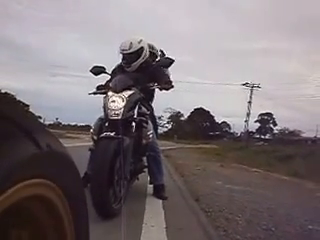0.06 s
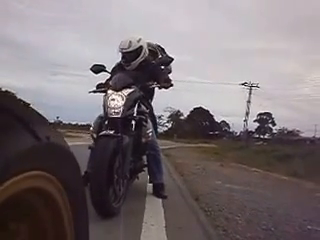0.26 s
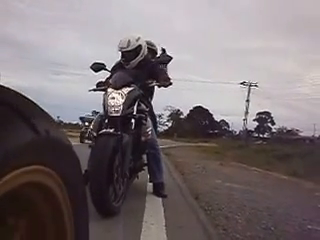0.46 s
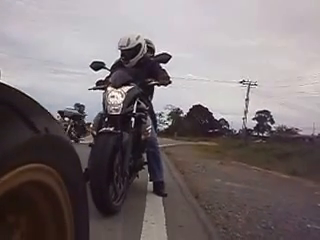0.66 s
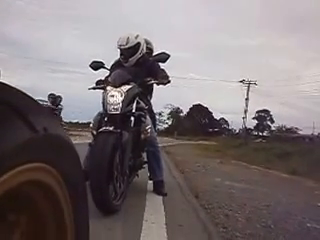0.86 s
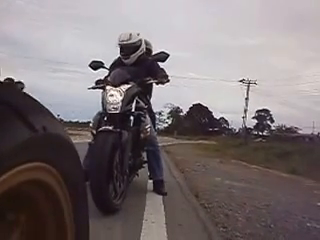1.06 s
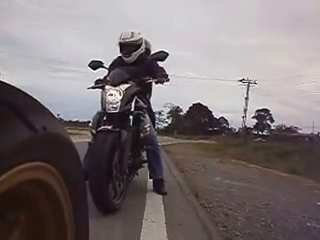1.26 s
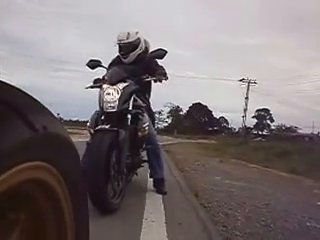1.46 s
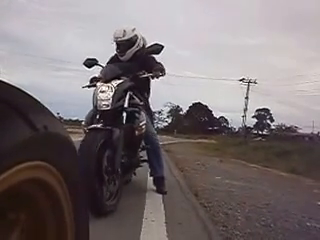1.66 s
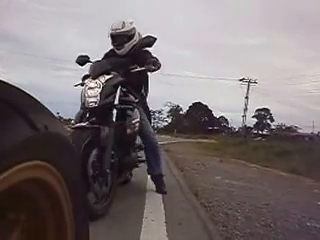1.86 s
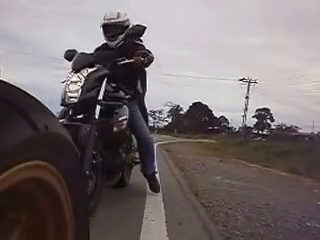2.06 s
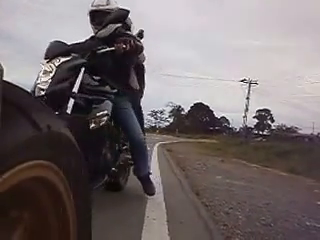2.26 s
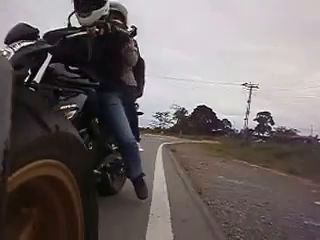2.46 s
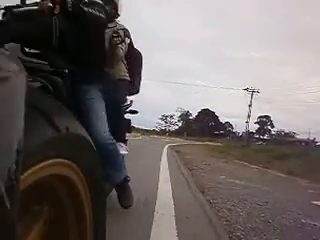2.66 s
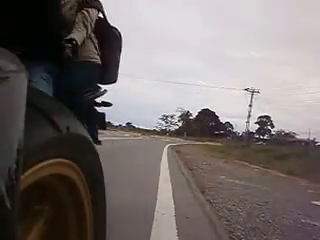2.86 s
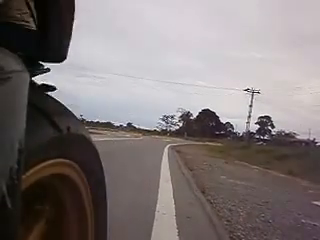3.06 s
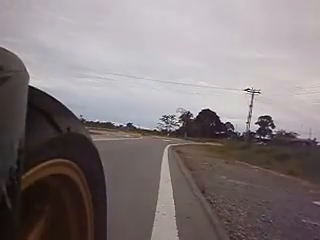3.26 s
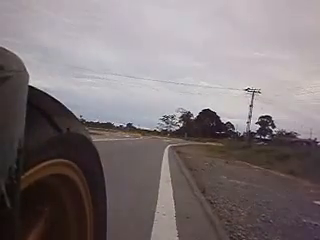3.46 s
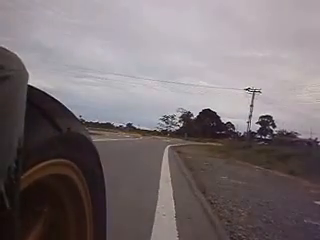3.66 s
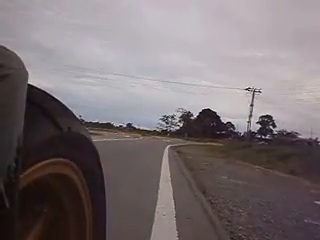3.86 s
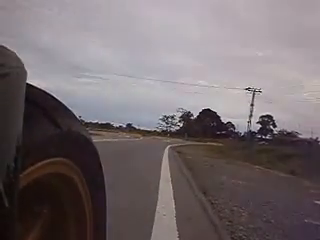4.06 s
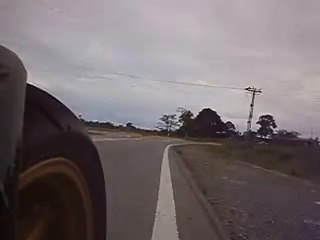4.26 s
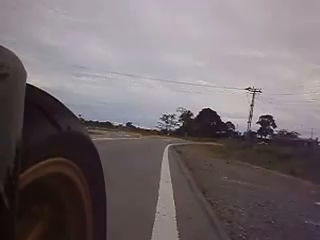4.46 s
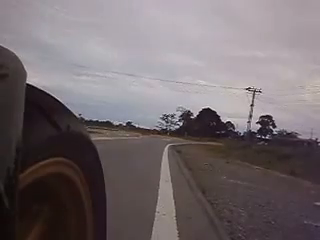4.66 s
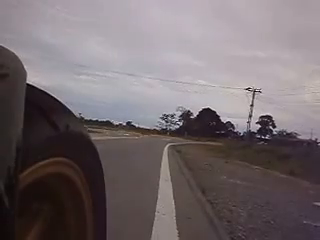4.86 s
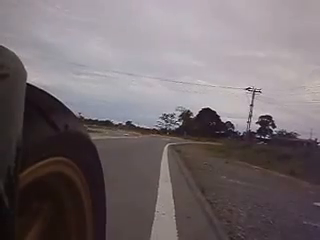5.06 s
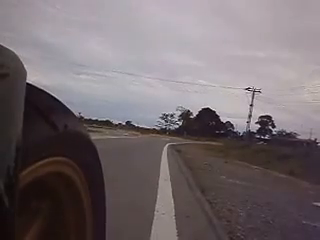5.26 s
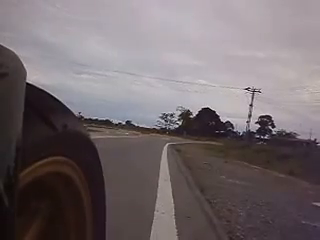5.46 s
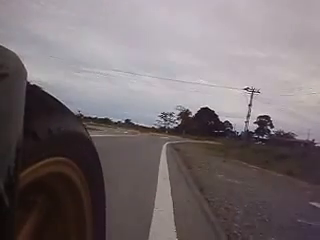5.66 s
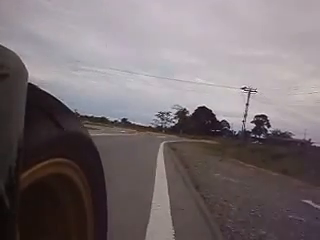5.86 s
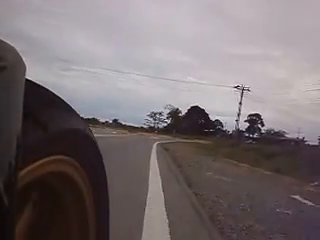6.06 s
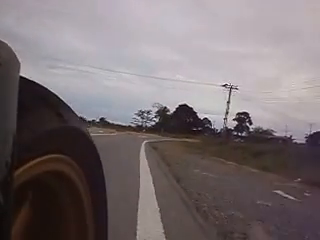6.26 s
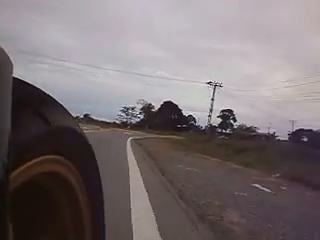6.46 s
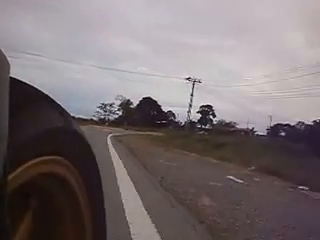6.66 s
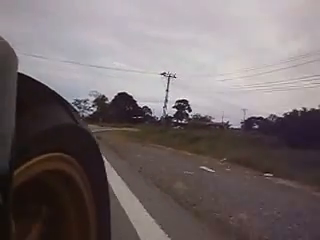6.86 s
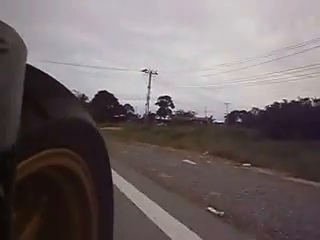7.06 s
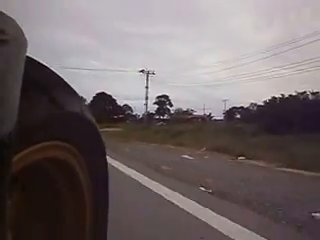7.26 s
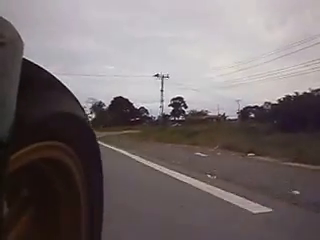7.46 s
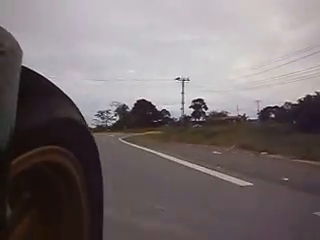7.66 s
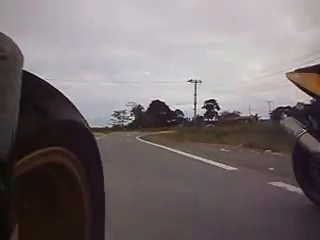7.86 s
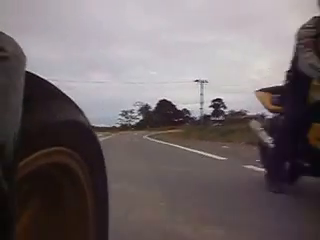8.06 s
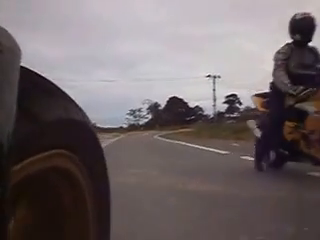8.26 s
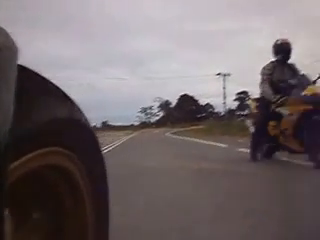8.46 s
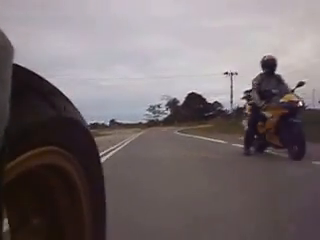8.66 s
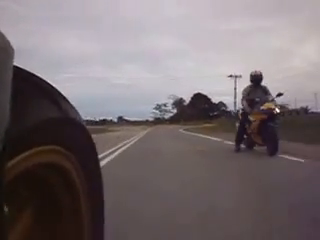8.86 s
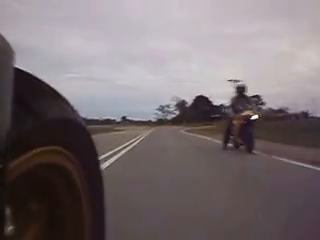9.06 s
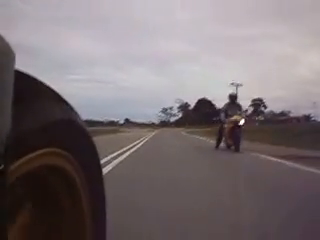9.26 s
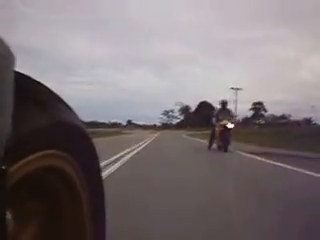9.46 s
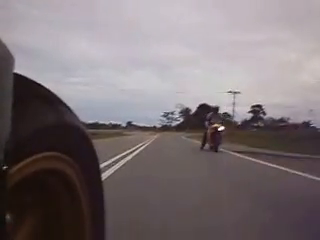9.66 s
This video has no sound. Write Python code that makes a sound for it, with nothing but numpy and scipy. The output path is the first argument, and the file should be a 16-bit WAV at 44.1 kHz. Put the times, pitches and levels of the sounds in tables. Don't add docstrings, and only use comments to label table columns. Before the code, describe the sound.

Close low-mounted microphone by a motorcycle: cranking starter, lumpy twin idle, four throttle blips, gear clunk, then a rising, rasping, overloaded pull-away.

```python
import sys
import numpy as np
from scipy import signal
from scipy.fft import rfft, irfft, next_fast_len
from scipy.io import wavfile
from scipy.ndimage import uniform_filter1d, map_coordinates

SR = 44100
rng = np.random.default_rng(int(sys.argv[2]) if len(sys.argv) > 2 else 0)


def boost_factor(decibels):
    exponent = np.asarray(decibels, float) / 20
    return 10 ** exponent


def wrap_up_sound(samples):
    columns = np.atleast_2d(samples).T
    tamed = np.clip(columns, -1, 1)
    steps = np.round(tamed * 32767).astype(np.int16)
    wavfile.write(sys.argv[1], SR, steps)


N = 428211


def unit(x):
    return x / np.sqrt(np.mean(x ** 2) + 1e-20)


def clock():
    return np.arange(N) / SR


def curves(rows):
    s, *cols = np.transpose(rows)
    return [np.interp(clock(), s, c) for c in cols]


def wobble(rate):
    return map_coordinates(rng.standard_normal(int(N * rate / SR) + 4), [np.arange(N) * rate / SR])


def bump(t, centre, half):
    return np.exp(-((t - centre) / half) ** 2)


def filtered(x, response):
    m = next_fast_len(len(x) + SR // 2)
    return irfft(rfft(x, m) * response(np.fft.rfftfreq(m, 1 / SR)), m)[:len(x)]


def colour(points):
    f, db = np.transpose(points)
    return lambda hz: boost_factor(np.interp(np.log(hz + 1), np.log(f), db))


def noise(points):
    return unit(filtered(rng.standard_normal(N), colour(points)))


def pipes(modes):
    def mode(f, centre, width, db):
        return boost_factor(db) * SR / np.pi * 1j * f / 2 / (centre * centre - f * f + 1j * f * width)
    return lambda f: sum(mode(f, *row) for row in modes)


def spikes(times, sizes):
    at = np.clip(times * SR, 0, N - 2)
    i = at.astype(int)
    return np.bincount(i, sizes * (1 - at + i), N) + np.bincount(i + 1, sizes * (at - i), N)


# t/s, speed [four-stroke cycles/s]
PULL_AWAY = [(5.442, 19.33), (5.591, 24.98), (5.889, 21.5), (6.086, 20.72), (6.67, 22.35), (6.93, 23.88),
             (7.203, 26.03), (7.512, 31.02), (7.804, 30.45), (8.311, 38.96), (8.719, 46.48), (9.582, 63.88),
             (9.71, 57.95)]
# t/s of first hard bang, held open [s], spin-up [s], peak speed [cycles/s]
THROTTLE_BLIPS = [
    (3.08, .13, .103, 21.07),
    (3.732, .078, .035, 21.46),
    (4.401, .129, .088, 22.84),
    (5.134, .076, .065, 21.63),
]
FIRST_PUFF_S = 1.963


def crank():
    settle_s, first_rate, idle_rate = .813, 7.79, 12.42
    free_rate, sag_per_s = 13.81, 16.12
    t = clock()
    rate = np.interp(t, [FIRST_PUFF_S, FIRST_PUFF_S + settle_s], [first_rate, idle_rate]) * (t >= FIRST_PUFF_S)
    for s, _, spin, peak in THROTTLE_BLIPS:
        blip = np.interp(t, [s, s + spin, s + spin + 1], [free_rate, peak, peak - sag_per_s])
        rate = np.where(t >= s, blip, rate)
    rate = np.where(t >= PULL_AWAY[0][0], curves(PULL_AWAY)[0], rate)
    return np.cumsum(rate) / SR, rate


def wind():
    buffet = noise([(12, -35.5), (30, -3.5), (60, 10), (150, -17), (600, -50.5)])
    return boost_factor(-46.5 + 1.9 * wobble(3.9)) * buffet


def idler(rate, pattern_db, scatter_db, jitter):
    cycle = np.cumsum(rate * (1 + .02 * wobble(1.3))) / SR
    beats = np.arange(1, int(cycle[-1]))
    chance = rng.standard_normal((int(N / SR * 70), 2))[:len(beats)]
    times = np.interp(beats + jitter * chance[:, 0], cycle, clock())
    return spikes(times, boost_factor(np.resize(pattern_db, len(beats)) + scatter_db * chance[:, 1]))


# f/Hz, level/dB
PASSER_RASP = [(400, -42), (800, -6.5), (1050, 0.5), (1600, -4), (2000, -12.5), (4000, -23.5), (5500, -75)]


def passer():
    pass_s, pass_half_s, pass_db = 1.315, 0.39, -33
    rasp = boost_factor(2.7 * wobble(40)) * noise(PASSER_RASP)
    return boost_factor(pass_db) * bump(clock(), pass_s, pass_half_s) * rasp


# t/s, thump level/dB
IDLERS_LEVEL = [
    (0, -21.5),
    (1.0, -19),
    (1.6, -16.5),
    (2.06, -23.5),
    (2.74, -23.5),
    (3.4, -33),
    (4.2, -29.5),
    (4.6, -26),
    (5.7, -33),
    (7.6, -19),
]
# f/Hz, level/dB
IDLERS_THUMP = [(18, -40.5), (30, -6.5), (119, 1), (214, -5), (237, -9.5), (300, -6.5), (380, -12),
                (524, -20), (581, -64), (1000, -28.5), (1300, -71.5), (2200, -120)]
# f/Hz, level/dB
VALVE_HISS = [(290, -8), (500, -4.5), (708, -7), (1070, -15), (1560, -15.5), (2210, -20.5), (2530, -24.5),
              (3740, -23), (4200, -30), (5460, -70.5), (9240, -120)]


def nearby():
    gear_db = -20
    valve_db, valve_power, valve_top = -22.5, 1.15, 90.4
    thump_db = curves(IDLERS_LEVEL)[0]
    valves = boost_factor(valve_db) * np.minimum(crank()[1] / valve_top, 1) ** valve_power
    gear = boost_factor(thump_db + gear_db) + valves
    beats = idler(53, [0, -3, -2], 1.8, .04) + .7 * idler(40.5, [0, -2.5], 1.8, .06)
    thump = 0.6 * unit(filtered(beats, colour(IDLERS_THUMP))) + 0.44 * noise(IDLERS_THUMP)
    hiss = boost_factor(1.2 * wobble(25) + 0.75 * wobble(4.8)) * noise(VALVE_HISS)
    swell_db = 1.1 * wobble(4)
    return boost_factor(thump_db + 4.5 + swell_db) * thump + boost_factor(4.37) * gear * hiss


# t/s, level/dB, rise [ms], centre f/Hz, bandwidth f/Hz
METAL_CONTACTS = [
    (0.704, -32, 0.97, 2020, 1540),
    (1.309, -22.5, 2.3, 2720, 3000),
    (1.568, -16, 15, 2030, 600),
    (1.579, -10, 2.7, 1680, 404),
    (1.582, -18, 4.9, 3220, 476),
    (4.969, -7.5, 9, 3460, 1360),
    (4.974, -11, 3.5, 990, 1160),
    (4.999, -17.5, 6.1, 2760, 2660),
    (5.033, -16.5, 5.8, 2160, 2460),
]


def clacks():
    t60_s = 0.068
    out, t = np.zeros(N + SR), np.arange(SR // 5) / SR
    for s, db, rise_ms, hz, width in METAL_CONTACTS:
        rattle = unit(filtered(rng.standard_normal(len(t)), pipes([(hz, width, 0)])))
        envelope = boost_factor(db - 60 * t / t60_s) * (1 - np.exp(-1000 * t / rise_ms))
        out[round(s * SR):][:len(t)] += envelope * rattle
    return out[:N]


# t/s, shaft f/Hz, whine level/dB
STARTER_SHAFT = [
    (1.31, 154.7, -26),
    (1.4, 163.6, -27),
    (1.43, 130, -41),
    (1.48, 142, -23.5),
    (1.54, 138.4, -32),
    (1.62, 164.3, -37),
    (1.76, 214.2, -32.5),
    (2.65, 215.7, -34.5),
    (2.95, 183.7, -50),
]
# shaft order, level/dB
TOOTH_ORDERS = [(7.4, -19.5), (9, -8), (10, -3), (11, -14), (14, -14), (20, -19.5)]
# f/Hz, level/dB
BRUSH_NOISE = [(350, -32), (600, -20.5), (683, -14.5), (1770, -12.5), (2190, -8.5), (2540, -18.5),
               (3870, -18), (4200, -16.5), (5460, -88.5), (9240, -120)]


def starter():
    brush_running_db, surge_db, surge_s = -31, 7.5, 0.3
    slip_s, slip_half_s, slip_db = 1.548, .022, -18
    drop_out_s, run_down_db_per_s = 3.12, 204
    (shaft_hz, whine_db), t = curves(STARTER_SHAFT), clock()
    on, off = STARTER_SHAFT[0][0], STARTER_SHAFT[-1][0]
    whine_db = whine_db - run_down_db_per_s * np.maximum(t - off, 0)
    brush_db = brush_running_db + surge_db * bump(t, on, surge_s) + slip_db * bump(t, slip_s, slip_half_s)
    brush_db = brush_db - run_down_db_per_s * np.maximum(t - drop_out_s, 0)
    switch = np.clip((t - on) / .005 + 1, 0, 1)
    turn = 2 * np.pi * np.cumsum(shaft_hz * (1 + 0.0055 * wobble(20) + 0.0028 * wobble(90))) / SR
    whine = sum(boost_factor(db + 1.5 * wobble(25)) * np.sin(k * turn) for k, db in TOOTH_ORDERS)
    brush = (1 + 0.15 * np.cos(turn)) * noise(BRUSH_NOISE)
    spark_db = 1.4 * wobble(60)
    return switch * (boost_factor(whine_db + 3.0) * whine + boost_factor(brush_db + spark_db) * brush)


LIFT_S = 9.62
# cycle order, level/dB
SHAKE_ORDERS = [(1, 8), (2, -5.5), (6, 0.5)]


def frame():
    shake_db, power, top_rate, lift_db = -11, 4.5, 54.5, -14.5
    cycle, rate = crank()
    lifted = np.clip((clock() - LIFT_S) / .03, 0, 1)
    shake = np.minimum(rate / top_rate, 1) ** power * boost_factor(shake_db + lift_db * lifted)
    orders = sum(boost_factor(db + 0.65 * wobble(2.7)) * np.sin(2 * np.pi * k * cycle) for k, db in SHAKE_ORDERS)
    return shake * orders


# t/s, level/dB, second cylinder relative level/dB
LOADED_BANGS = [
    (5.44, 1, -5),
    (6.0, -2, -4),
    (6.6, 0, -7),
    (7.049, -2, 3.5),
    (7.5, 4, 4.5),
    (7.998, 1, 6.5),
    (8.551, 10.5, -6),
    (9.55, 3.5, 0),
    (9.71, 2, 7),
]
# t/s, half length [s], level/dB
STUMBLES = [
    (2.26, 0.17, -16),
    (4.847, .05, -10.5),
]
# speed [cycles/s], lag [share of a cycle], level/dB
AFTER_PUFF = [(21, .43, -15), (33, .44, -8.5), (52, .464, -2)]


def firings():
    second_lag = .237
    misfire_rate, misfire_db = 16, -15
    idle_db, blip_level_db, overrun_db = -5.5, 0, -8
    idle_lean_db, blip_lean_db = 0.5, -2.5
    shut_scatter_db, open_scatter_db = 1.4, .6
    (cycle, rate), t = crank(), clock()
    away_s, blip_starts = PULL_AWAY[0][0], [b[0] for b in THROTTLE_BLIPS]

    marks = np.interp([FIRST_PUFF_S, *blip_starts, away_s, N / SR], t, cycle)
    turns = np.concatenate([np.arange(a + 1e-4, b - 1 / 2) for a, b in zip(marks, marks[1:])])
    pair = np.tile(turns, 2)
    chance = rng.standard_normal((len(turns), 5)) * [3e-5, 4e-5, 1, 1, 1]
    times = np.interp(np.r_[turns, turns + second_lag], cycle, t) + np.r_[chance[:, 0], chance[:, 1]]
    second, speed = np.repeat([0, 1], len(turns)), np.interp(times, t, rate)
    pulling = times > away_s - .01
    blipped = sum((times > s - .01) & (times < s + held) for s, held, *_ in THROTTLE_BLIPS)
    opened = pulling + blipped

    starved = (np.tile(chance[:, 4] > 0, 2) == second) & (speed > misfire_rate)
    shut_db = np.where(times < blip_starts[0], idle_db, overrun_db)
    shut_db = shut_db + misfire_db * starved + idle_lean_db * second
    shut_db = shut_db + sum(db * bump(times, s, half) for s, half, db in STUMBLES)

    since = times - np.array(blip_starts)[np.searchsorted(marks[1:5], pair) - 1]
    blip_db = blip_level_db + blip_lean_db * second + 2.5 * bump(since, .065, .04)
    knots, load_db, lean_db = np.transpose(LOADED_BANGS)
    loaded_db = np.interp(times, knots, load_db) + second * np.interp(times, knots, lean_db)
    level = np.where(pulling, loaded_db, np.where(blipped, blip_db, shut_db))
    scatter_db = np.where(opened, open_scatter_db, shut_scatter_db)
    level = level + scatter_db * np.r_[chance[:, 2], chance[:, 3]]
    rasp_db = -1 + 0.31 * (np.maximum(speed, 21) - 21) - 21 * (times > LIFT_S)

    lead = (opened > 0) & (second == 0)
    at, lag, after_db = np.transpose(AFTER_PUFF)
    after = np.interp(pair[lead] + np.interp(speed[lead], at, lag), cycle, t)
    after_level = level[lead] + np.interp(speed[lead], at, after_db)
    return (np.r_[times, after], np.r_[level, after_level],
            np.r_[rasp_db, rasp_db[lead]], np.r_[opened, opened[lead]])


# f/Hz, bandwidth f/Hz, level/dB
COOL_SILENCER = [(66, 40, -4), (100, 36, -2), (365, 90, -5), (192, 40, 0)]
# f/Hz, bandwidth f/Hz, level/dB
HOT_SILENCER = [(105, 62, -26.5), (240, 120, 3), (395, 64, 2.5)]


def silencer(times, db, opened):
    def suck(f):
        return -38 * np.exp(-(f / 640) ** 2 + 2j * np.pi * f * 0.0016)

    def cool(f):
        return boost_factor(-9.5) * pipes(COOL_SILENCER)(f) * np.exp(-(f / 700) ** 2) + suck(f)

    def lazy(f):
        low_ring = pipes([(205, 38, 0), (78, 30, -4), (700, 150, -8)])(f)
        return (cool(f) + boost_factor(-6.5) * low_ring) * np.exp(-(f / 520) ** 2)

    def hot(f):
        swell = 30 * np.exp(-(f / 260) ** 2 + 2j * np.pi * f * .0042)
        return boost_factor(-9.5) * pipes(HOT_SILENCER)(f) * np.exp(-(f / 900) ** 2) + 0.24 * suck(f) + swell

    heat = np.clip((times - 6.9) / 2.12, 0, 1)
    shares = ((1 - opened, lazy), (opened - heat, cool), (heat, hot))
    return sum(filtered(spikes(times, boost_factor(db) * share), pipe) for share, pipe in shares)


# f/Hz, bandwidth f/Hz, level/dB
TAILPIPE_MODES = [(504.2, 91, -0.5), (686, 49, -17), (747.3, 82, -0.5), (898, 123, 1.5), (1286, 116, 0.5),
                  (1534, 250, -9.5), (2940, 170, -4)]


def tailpipe(times, sharp):
    lead_s = .00066
    edges = spikes(times - lead_s, sharp)
    return filtered(edges, lambda f: boost_factor(-14.5) * pipes(TAILPIPE_MODES)(f) / (1 + (f / 3000) ** 2))


# f/Hz, bandwidth f/Hz, level/dB
HOWL_MODES = [(1294, 296, 5), (760, 59, -19)]


def howl(times, sharp):
    start_s, build_s = 7.34, 2.8
    voice = np.clip((times - start_s) / build_s, 0, 1) ** 2.8
    return boost_factor(4.5) * filtered(spikes(times, sharp * voice), lambda f: sum(
        pipes([mode])(f) ** 2 * mode[1] / SR for mode in HOWL_MODES))


# f/Hz, level/dB
BLOW_DOWN_GAS = [(500, -27), (1100, 2), (1600, -10), (2000, -9.5), (2600, -11.5), (3400, -8), (4100, -10.5),
                 (5500, -64.5)]


def blow_down(times, db, rasp_db):
    t = np.arange(SR // 20) / SR
    opening = spikes(times - .0012, boost_factor(1.3 * db + .45 * rasp_db - 17))
    rise = 1 - np.exp(-t / .0015)
    puff = signal.fftconvolve(opening, boost_factor(-60 * t / 0.032) * rise)[:N]
    return puff * noise(BLOW_DOWN_GAS)


def twin():
    times, db, rasp_db, opened = firings()
    rasp_db = rasp_db - 7 * (1 - opened)
    sharp = boost_factor(1.17 * db + rasp_db)
    exhaust = silencer(times, db, opened) + tailpipe(times, sharp) + howl(times, sharp)
    return exhaust + blow_down(times, db, rasp_db)


def scene():
    return (wind() + nearby() + passer() + clacks() + starter() + frame() + twin())[None]


def roll_off(x):
    return signal.sosfilt(signal.butter(12, 16640, fs=SR, output="sos"), x)


def record(dry):
    top, knee, edge_hz = 0.76, 7, 4000
    x = filtered(dry[0], lambda f: (1j * f / (38 + 1j * f)) ** 3)
    x = x / (1 + np.abs(x / top) ** knee) ** (1 / knee)
    x = filtered(x, lambda f: 1 / (1 + (f / 3950) ** 36) * (f < 4400))
    x = x + boost_factor(-27) * uniform_filter1d(x ** 2, size=2000) * np.sin(2 * np.pi * edge_hz * clock())
    offset = .002
    x = np.clip(x - offset, -.7, .735)
    return roll_off(x[None])


dry = scene()
out = record(dry)
wrap_up_sound(out)
```